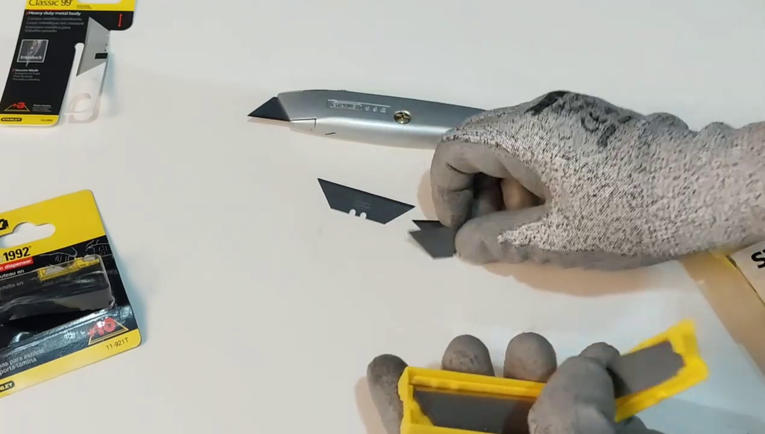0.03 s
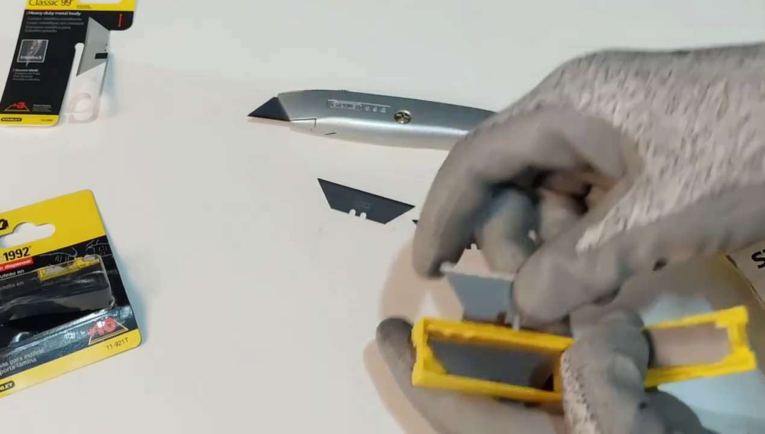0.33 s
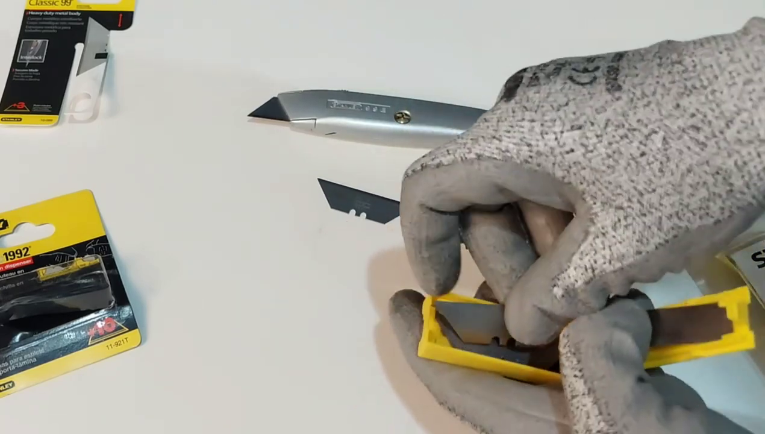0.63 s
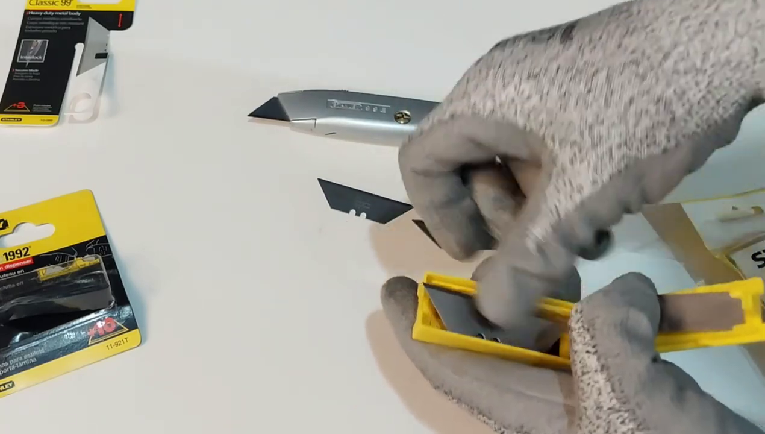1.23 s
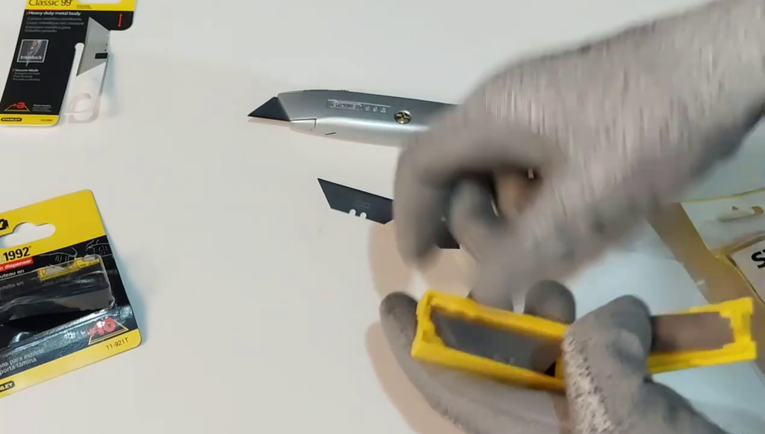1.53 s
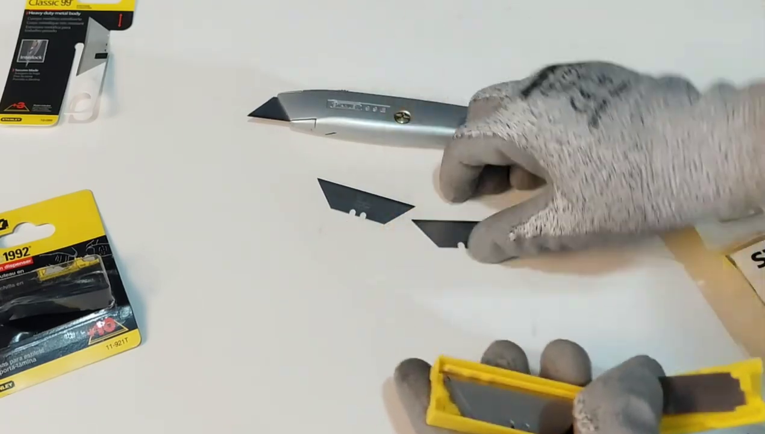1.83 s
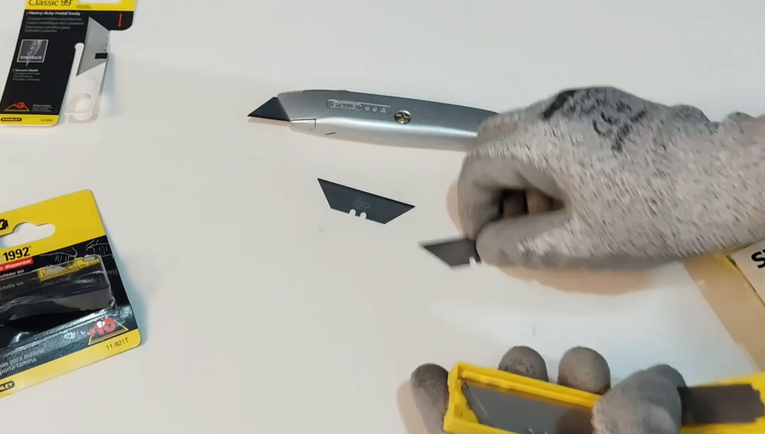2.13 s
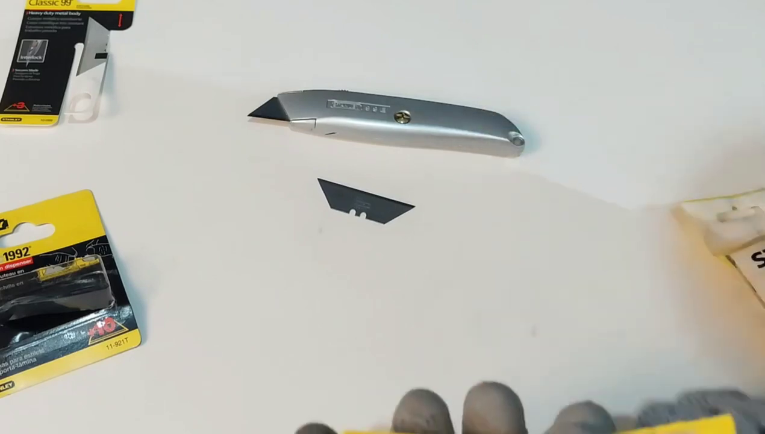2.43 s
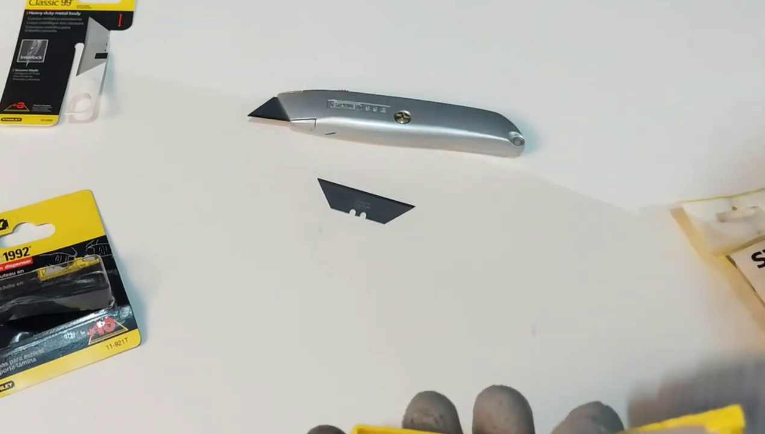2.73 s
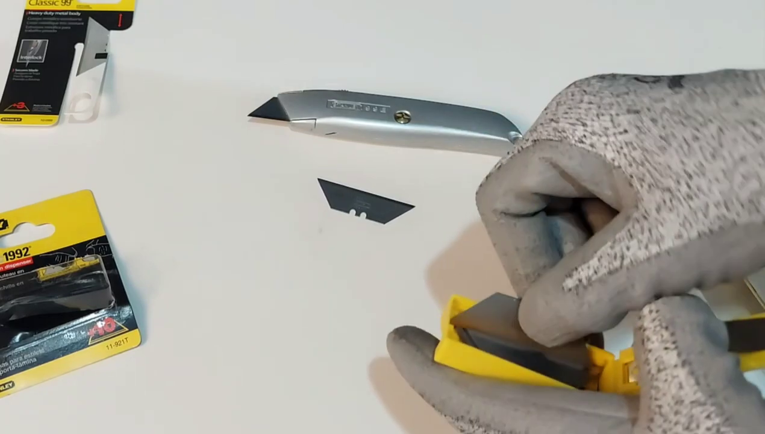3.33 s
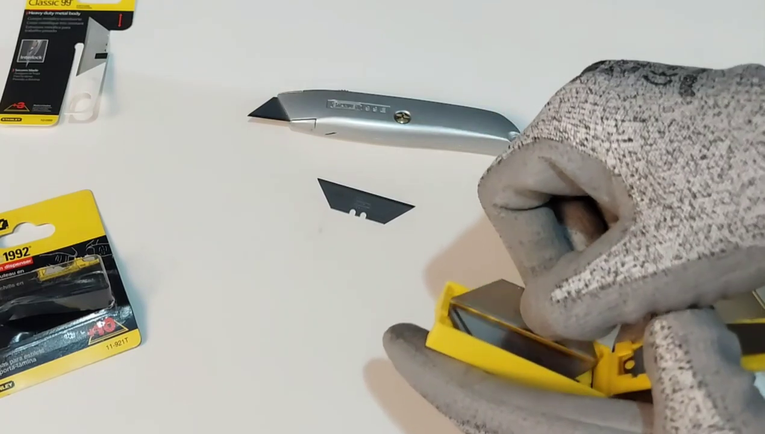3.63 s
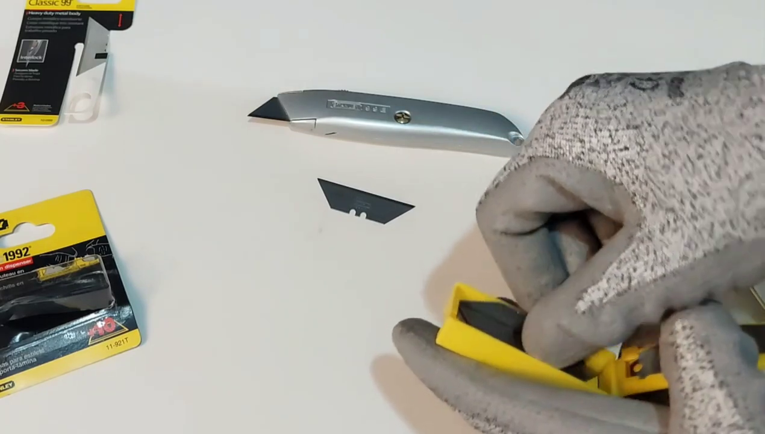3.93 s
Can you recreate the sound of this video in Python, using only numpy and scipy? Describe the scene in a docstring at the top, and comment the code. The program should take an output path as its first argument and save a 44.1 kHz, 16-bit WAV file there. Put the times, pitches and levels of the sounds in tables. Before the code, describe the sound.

Thin steel blades scrape faintly on a table and tick against a plastic dispenser, close by. At 1.3 seconds one snaps in sharply. At 1.6 another drops, bouncing with a bright, brief ring, the loudest moment. From 2.3 to 2.9 a blade slides, softly rasping and squeaking. Light clicks follow from 3.5 to 3.8. A few soft table bumps and a steady fan hum lie underneath in the small room.

```python
"""Gloved hands pick steel utility blades off a table and fit them into a plastic dispenser.
First, blades scrape over the tabletop and tick against the dispenser. At 1.3 s one snaps onto the stack.
At 1.6 s one drops on the table, bounces and rings. From 2.3 s a blade is dragged to the table's edge,
rasping and squeaking as it catches. A few more slides and light ticks follow.
All the while a fan-like hum fills the small room."""
import sys
import numpy as np
from scipy import signal
from scipy.fft import rfft, irfft
from scipy.io import wavfile

SR = 44100
rng = np.random.default_rng(int(sys.argv[2]) if len(sys.argv) > 2 else 0)


def inscribe(sig):
    """Save sig as 16-bit PCM at rate SR to the path in sys.argv[1].

    A 1-D sig is mono; a 2-D sig holds one channel per row.
    Samples are clipped to [-1, 1] before scaling.
    """
    pcm = np.round(np.clip(np.atleast_2d(sig).T, -1, 1) * 32767)
    wavfile.write(sys.argv[1], SR, pcm.astype(np.int16))


N = 176400
TIME = np.arange(N) / SR

# A blade touches the table, the dispenser or the stack. Each row: start in seconds, level in dB,
# fade time in seconds, sizzle pitch in Hz, body level in dB, body's low edge in Hz, ring pitch in Hz,
# ring level in dB. Body and ring levels are relative to the sizzle.
TOUCHES = [ (0.1228, -59, 0.0023, 11000, -10, 2000, 10700, 9),
           (0.1916, -48.5, 0.0013, 12000, -4, 900, 3720, 3.5),
           (0.254, -55, 0.0032, 11300, -16, 1500, 12500, 4.5),
           (.699, -56, 0.0011, 11100, -23, 4000, 12300, -2),
           (.7645, -58, 0.0017, 11300, -11, 4000, 12600, -23),
           (0.7928, -59, 0.0013, 10600, -10, 4000, 8040, -10),
           (1.0793, -63, 0.0016, 11000, -2, 3500, 9900, 6),
           (1.101, -48, 0.00075, 11400, -15, 3500, 11900, -1),
           (1.2302, -49.5, 0.0044, 13000, -24, 1200, 1770, -1.5),
           (1.2369, -42, 0.0027, 10900, -35, 2500, 3730, -3),
           (1.286, -22, 0.0023, 11700, -13, 3130, 14400, -6),
           (1.285, -39.5, 0.0021, 9250, 7, 595, 1540, -1.5),
           (1.296, -45, 0.0017, 12000, -13, 2800, 10140, 11.5),
           (1.3287, -38.5, 0.00098, 10700, -0.5, 746, 3250, -3),
           (1.588, -38.5, 0.0026, 13100, -10, 1500, 8900, -4),
           (1.596, -39.5, .012, 11500, -15, 3030, 12130, -3),
           (1.5985, -25.5, .0017, 12000, -13.5, 3540, 10300, -4),
           (1.602, -41.5, 0.0035, 9700, -6.5, 900, 8250, 5), (2.901, -62, 0.01, 13500, -7, 1400, 2450, -2),
           (3.481, -54, 0.00077, 10500, -17, 3530, 10400, 6),
           (3.5812, -51.5, 0.0017, 13200, -11, 1000, 10600, 3),
           (3.5995, -47.5, 0.0018, 11700, -27, 4000, 6400, -7),
           (3.6762, -34.5, 0.00073, 14000, -11, 4630, 12600, -6),
           (3.7095, -48.5, 0.0014, 11000, -8, 4300, 5300, -10),
           (3.8265, -47.5, 0.0018, 11500, -13, 3750, 12600, -8)]


def blade_ticks(sizzle_width_hz=3600, body_top_hz=6300, ring_width_hz=360):
    """Steel chatters for an instant at each touch: a bright sizzle, a duller body and a short ring."""
    out, t = np.zeros(N + SR), TIME[:SR // 20]
    for start, db, fade_s, sizzle_hz, body_db, body_low_hz, ring_hz, ring_db in TOUCHES:
        fade = np.exp(-t / fade_s)
        chatter = rng.choice([-1., 1.], len(t)) * fade
        sizzle = rms_one(band(chatter, sizzle_hz - sizzle_width_hz / 2, sizzle_hz + sizzle_width_hz / 2))
        body = rms_one(band(chatter, body_low_hz, body_top_hz, order=3))
        ring = rms_one(resonate(rng.standard_normal(len(t)) * fade, ring_hz, ring_width_hz))
        tick = sizzle + from_db(body_db) * body + from_db(ring_db) * ring
        at = int(start * SR)
        out[at:at + len(t)] += from_db(db) * np.sqrt(np.mean(fade ** 2)) * tick
    return out[:N]


# A dropped blade lands on a corner, falls flat and bounces. Each row: start in seconds, level in dB.
LANDINGS = [(1.588, -32), (1.5988, -16), (1.626, -40.5)]
# The notes a blade rings with. Each row: pitch in Hz, slap level and ping level in dB relative to
# the landing, seconds for the ping to fade by 60 dB.
BLADE_NOTES = [(8250, -14, -44, .06), (9100, -12.5, -42, .06), (9880, -17, -25, 0.21),
               (12090, 0.5, -21, 0.087), (15000, -6.5, -36, .05)]


def dropped_blade(slap_fade_s=0.0014, rattle_hz=130, blur_radians=1.1):
    """Each landing rings the blade hard; the table stops that slap at once and a rattling ping lingers."""
    out, t = np.zeros(N + SR), TIME[:SR // 2]
    for hz, slap_db, ping_db, ping_s in BLADE_NOTES:
        phase = 2 * np.pi * hz * t
        slap = from_db(slap_db) * np.exp(-t / slap_fade_s) * np.sin(phase)
        rattle = blur_radians * drift(rattle_hz)[:len(t)]
        ping = from_db(ping_db) * np.exp(-np.log(1000) * t / ping_s) * np.sin(phase + rattle)
        for start, db in LANDINGS:
            at = int(start * SR)
            out[at:at + len(t)] += from_db(db) * (slap + ping) * rng.choice([-1, 1])
    return out[:N]


# The tone of rubbed steel and of the rubbed table. Each row: frequency in Hz, relative level in dB.
STEEL_HISS = [(3530, -18.5), (6000, -12), (6840, -14), (7550, -12), (8060, -10.5), (8970, -9), (10100, 0.5),
              (13100, -9), (15200, -15)]
TABLE_RASP = [(530, -93), (900, -2), (1040, -14), (1250, -1), (1580, -3.5), (1760, -0.5), (2290, 1.5),
              (3300, -1.5), (5200, -1.5), (6500, -20), (14300, -71)]
# The notes of a blade pinched between fingers. Each row: pitch in Hz, relative level in dB.
GRIP_NOTES = [(2450, -3.5), (3120, -1.5), (3800, -3), (4700, 1), (8250, -9.5), (10200, -10), (11650, -6.5)]
# The long drag to the table's edge. Each row: time in seconds, hiss level in dB, rasp level in dB
# before its trim.
LONG_DRAG = [(2.29, -77.5, -80.5), (2.355, -59, -64), (2.405, -54.5, -58.5), (2.455, -55, -59.5),
             (2.525, -47, -49.5), (2.57, -49, -50), (2.64, -57, -57.5), (2.73, -73.5, -84)]
# Short slides. Each row: start, rise, hold and fade times in seconds, level in dB, rasp level in dB
# relative to the hiss.
SHORT_SLIDES = [ (0.008, 0.026, .0071, 0.044, -69, -7), (.118, 0.0044, 0.0053, 0.027, -62.5, 5),
                (0.173, 0.017, .014, 0.031, -69.5, 6), (0.228, 0.027, .0073, 0.014, -60.5, -4.5),
                (1.077, .021, .01, .027, -70, -7), (1.223, .011, .044, 0.016, -61.5, -3.5),
                (1.269, 0.017, 0.084, 0.046, -61.5, -20), (2.728, 0.041, 0.016, 0.038, -62, -6),
                (2.893, 0.011, 0.0073, .045, -63.5, -7.5), (3.482, .008, 0.0078, 0.043, -63.5, -15),
                (3.58, .015, 0.0095, 0.08, -70, -13), (3.819, 0.0068, 0.013, 0.09, -64, -18)]


def scrapes(split_hz=6500, drag_trim_db=-2.5):
    """A sliding blade rubs on the table: the steel hisses up high and the table rasps lower down."""
    hiss = rubbing(STEEL_HISS, [(hz, db) for hz, db in GRIP_NOTES if hz > split_hz])
    rasp = rubbing(TABLE_RASP, [(hz, db) for hz, db in GRIP_NOTES if hz <= split_hz])
    times, hiss_levels, rasp_levels = np.transpose(LONG_DRAG)
    out = hiss * from_db(np.interp(TIME, times, hiss_levels, left=-120, right=-120))
    out += rasp * from_db(drag_trim_db + np.interp(TIME, times, rasp_levels, left=-120, right=-120))
    for start, rise, hold, fade, db, rasp_db in SHORT_SLIDES:
        out += from_db(db) * push(start, rise, hold, fade) * (hiss + from_db(rasp_db) * rasp)
    return out


def rubbing(spectrum, notes, notes_db=-5.5, note_width_hz=210, grip_shift_hz=15, grip_swing_db=10.5):
    """Shaky rubbing noise in which the blade's notes swell and fade as the grip shifts."""
    out = colour(friction(), spectrum)
    for hz, db in notes:
        swell = rms_one(from_db(grip_swing_db * np.tanh(drift(grip_shift_hz))))
        note = rms_one(resonate(friction(), hz, note_width_hz))
        out += from_db(notes_db + db) * swell * note
    judder = from_db(1.7 * drift(rate_hz=57))
    return rms_one(out * judder)


def friction(catches_per_s=6600, spread_db=2):
    """An edge catches on a surface thousands of times a second, each time with a tiny click."""
    sizes = from_db(spread_db * np.minimum(rng.exponential(1, N), 5))
    return sizes * rng.choice([-1, 1], N) * (rng.random(N) < catches_per_s / SR)


# The sliding edge catches and sings. Each row: start, rise and fade times in seconds, pitch in Hz,
# level in dB, pitch wobble in Hz.
SQUEAKS = [ (.025, 0.026, .12, 2620, -70, 160), (.118, .008, 0.044, 11080, -59, 200),
           (.17, 0.022, 0.074, 1150, -55, 482), (.19, 0.0083, 0.049, 10100, -60, 181),
           (.225, .03, 0.021, 2670, -56.5, 330), (2.34, 0.073, 0.078, 11550, -61, 255),
           (2.495, 0.027, 0.033, 3680, -50.5, 620), (2.508, 0.011, .005, 2370, -50.5, 118),
           (2.53, 0.022, 0.059, 10080, -53.5, 150.5), (2.55, .06, .07, 1780, -63, 109.7),
           (2.558, .012, .007, 2305, -50.5, 160), (2.875, .028, 0.01, 4260, -69.5, 69.5),
           (2.888, 0.019, 0.039, 10280, -56.5, 96)]


def squeaks(flutter_hz=246, roughness_db=4):
    """Sticking and slipping keeps one note of the blade going, unsteady in pitch and loudness."""
    out = np.zeros(N)
    for start, rise, fade, hz, db, wobble_hz in SQUEAKS:
        phase = 2 * np.pi * np.cumsum(hz + wobble_hz * drift(flutter_hz)) / SR
        flutter = from_db(roughness_db * drift(flutter_hz))
        out += from_db(db) * push(start, rise, 0, fade) * rms_one(flutter * np.sin(phase))
    return out


# The hands bump the table. Each row: start in seconds, peak level in dB.
HAND_BUMPS = [(0.191, -47.5), (1.591, -51), (3.479, -48.5)]


def table_bumps(pitch_hz=55.4, fade_s=0.024):
    """The tabletop booms softly under the hands."""
    out = np.zeros(N)
    for start, db in HAND_BUMPS:
        t = np.maximum(TIME - start, 0)
        swell = t / fade_s * np.exp(1 - t / fade_s)
        out += from_db(db) * swell * np.sin(2 * np.pi * pitch_hz * t)
    return out


# The fan's low rush and the background hiss. Each row: frequency in Hz, relative level in dB.
FAN_RUSH = [(20, -24.5), (50, -17.5), (75, -17), (100, -1), (125, -13), (190, 2), (250, -5.5), (310, -2),
            (370, -4), (420, -12), (520, -15), (660, -18), (820, -21.5), (1000, -35), (1300, -46.5)]
AIR_HISS = [(590, -32.5), (1000, -5.5), (1250, -2), (1470, -1.5), (5020, -15), (7270, -10.5), (8550, -9.5),
            (9830, -2), (11400, -6), (12300, -9), (14900, -18)]
# The pitches of the fan's hum, in Hz.
HUM_PITCHES = [55, 100, 173.3, 221, 346.6, 435, 694, 784]
# The hum at each of those pitches. Each row: level in dB, unsteady share from 0 to 1.
HUM_LEVELS = [(-65.5, 0.68), (-66, 0.92), (-48, 0.19), (-60, .9), (-49, 0.32), (-67, .7), (-72, .7),
              (-71.5, .7)]


def fan(rush_db=-47.5, hiss_db=-76.5, waver_hz=12.9):
    """The fan hums with several wavering tones over a low rush and a faint hiss."""
    out = from_db(rush_db) * colour(rng.standard_normal(N), FAN_RUSH)
    out += from_db(hiss_db) * colour(rng.standard_normal(N), AIR_HISS)
    for hz, (db, unsteady) in zip(HUM_PITCHES, HUM_LEVELS):
        phase = 2 * np.pi * (hz * TIME + rng.random())
        steady = np.sqrt(2 * (1 - unsteady ** 2)) * np.sin(phase)
        waver = drift(waver_hz) * np.sin(phase) + drift(waver_hz) * np.cos(phase)
        out += from_db(db) * (steady + unsteady * waver)
    return out


def room(x, echo_s=0.26, gap_s=0.0031, echo_db=-10.5, middle_boost_db=5.5):
    """The walls of a small room send back a blur of quick echoes, strongest in the middle pitches."""
    t = TIME[:SR // 2]
    tail = rng.standard_normal(len(t)) * np.exp(-np.log(1000) * t / echo_s) * (t > gap_s)
    tail /= np.sqrt(np.sum(tail ** 2))
    tail += (from_db(middle_boost_db) - 1) * band(tail, 500, 3300, order=1)
    return from_db(echo_db) * signal.fftconvolve(x, tail)[:N]


def push(start, rise, hold, fade):
    """A loudness curve that climbs to 1, holds and dies away; times are in seconds."""
    return np.clip((TIME - start) / rise, 0, 1) * np.exp(-np.clip((TIME - start - rise - hold) / fade, 0, 20))


def drift(rate_hz):
    """A smooth random wobble, about 1 in size; a higher rate makes it quicker."""
    smoothing = signal.butter(2, rate_hz, fs=SR, output="sos")
    return rms_one(signal.sosfilt(smoothing, rng.standard_normal(N + SR))[SR:])


def from_db(db):
    """Turn decibels into a number to multiply by."""
    return 10 ** (np.asarray(db) / 20)


def rms_one(x):
    """Scale a sound so that its average strength (rms) is 1."""
    return x / np.sqrt(np.mean(x ** 2) + 1e-20)


def band(x, low_hz, high_hz, order=2):
    """Keep the part of a sound between two frequencies."""
    return signal.sosfilt(signal.butter(order, [low_hz, high_hz], "band", fs=SR, output="sos"), x + 1e-18)


def resonate(x, hz, width_hz):
    """Make a sound ring at one pitch; a smaller width rings longer."""
    r = np.exp(-np.pi * width_hz / SR)
    return signal.lfilter([1, 0, -1], [1, -2 * r * np.cos(2 * np.pi * hz / SR), r * r], x + 1e-18)


def colour(x, spectrum):
    """Shape a sound's lows and highs to follow a table, falling steeply beyond its ends."""
    hz, db = np.transpose(spectrum)
    f = np.maximum(np.fft.rfftfreq(N, 1 / SR), 1)
    gain = from_db(np.interp(np.log(f), np.log(hz), db))
    edges = np.minimum(1, np.minimum(f / hz[0], hz[-1] / f)) ** 6
    return rms_one(irfft(rfft(x) * gain * edges, N))


def scene(walls=4):
    """Mix blades, echoes, bumps and fan; a touch sends a different chatter towards each wall."""
    steel = dropped_blade() + scrapes() + squeaks()
    tick_echoes = sum(room(blade_ticks()) for _ in range(walls)) / np.sqrt(walls)
    echoes = tick_echoes + room(steel)
    return (blade_ticks() + steel + echoes + table_bumps() + fan())[None]


def record(dry, cutoff_hz=15550):
    """Cut away the very highest treble."""
    return signal.sosfilt(signal.ellip(10, .2, 80, cutoff_hz, fs=SR, output="sos"), dry)


dry = scene()
out = record(dry)
inscribe(out)
```